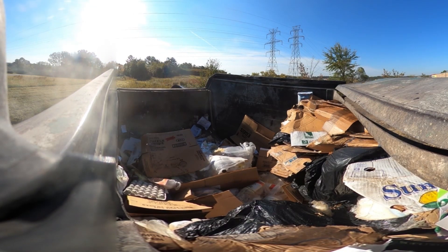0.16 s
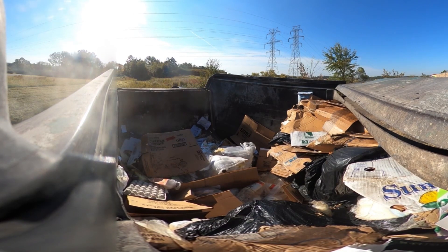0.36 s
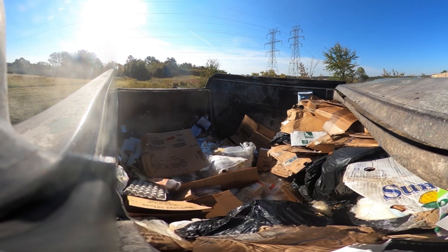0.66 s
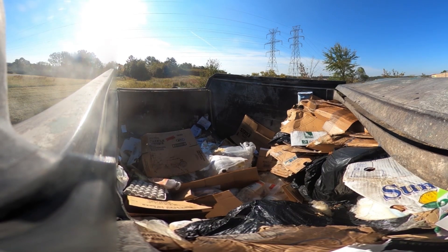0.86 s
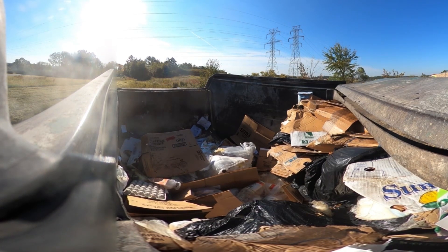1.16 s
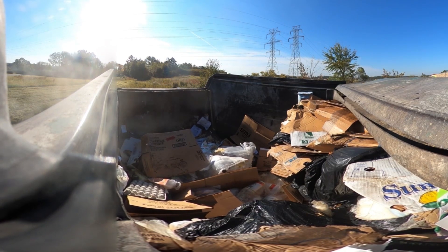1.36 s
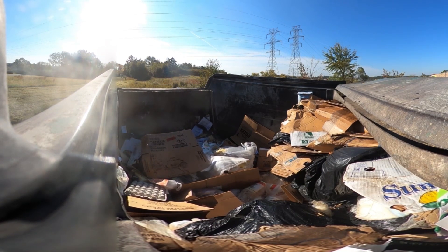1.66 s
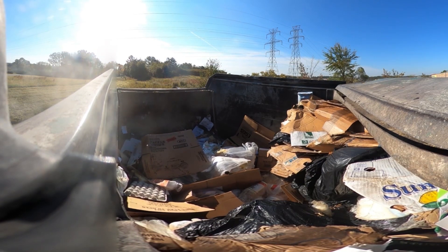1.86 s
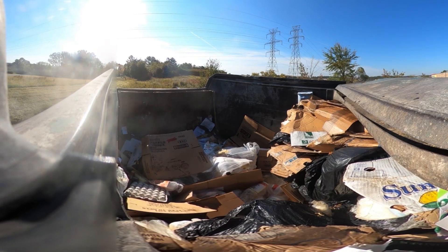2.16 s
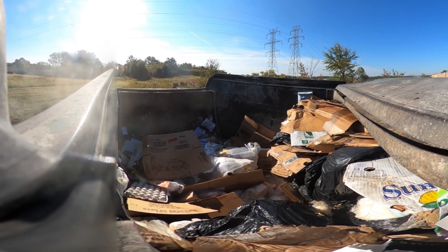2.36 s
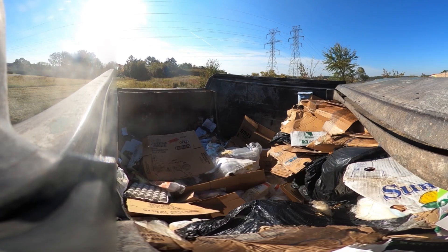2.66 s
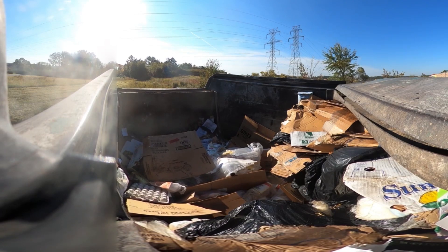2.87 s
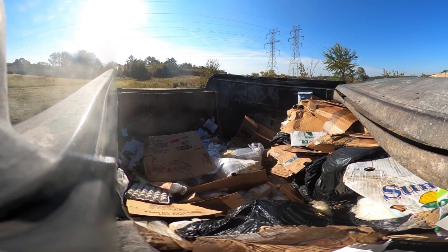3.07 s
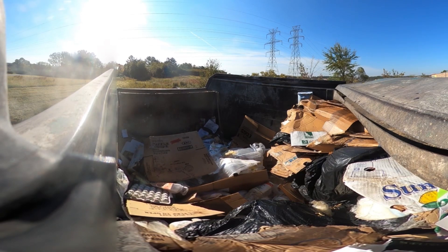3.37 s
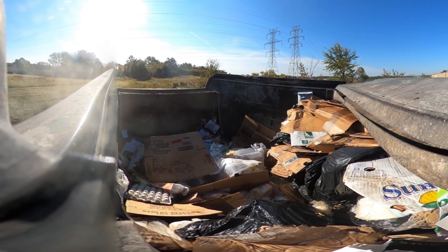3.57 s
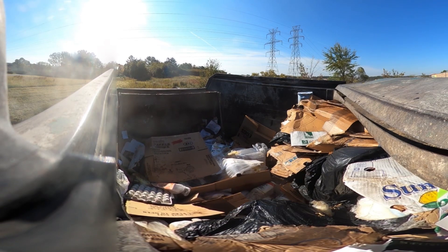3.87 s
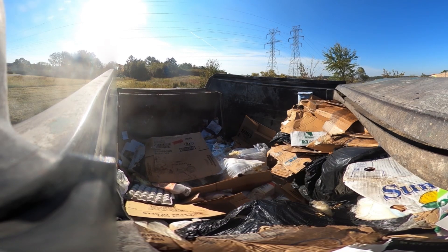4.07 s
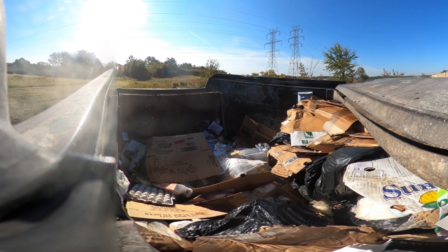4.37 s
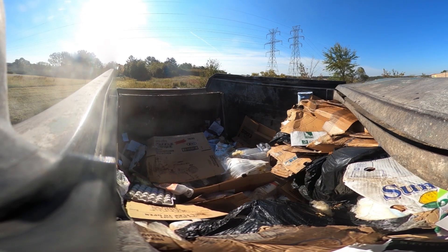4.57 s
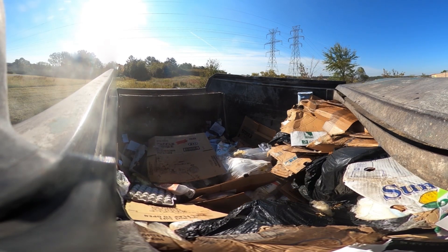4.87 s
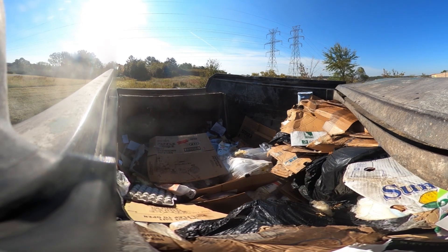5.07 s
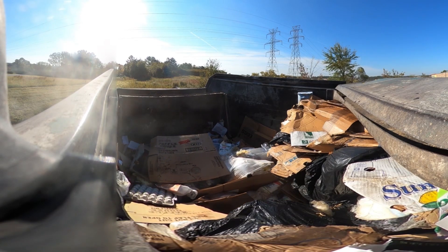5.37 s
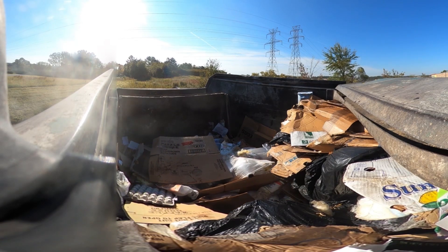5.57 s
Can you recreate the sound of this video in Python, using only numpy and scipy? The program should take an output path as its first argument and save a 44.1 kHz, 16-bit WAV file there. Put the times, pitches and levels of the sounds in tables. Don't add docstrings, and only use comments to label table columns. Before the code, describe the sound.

Outdoors, close on a steel refuse container, a truck diesel idles low beside a second, steadily knocking diesel. Almost at once the container is jolted in a dense, booming crash with rattling lids and puffs of hissing air. A final heavy blow rings the side panel, then a hydraulic pump hums and the truck engine revs up, with small ticks and a few soft thuds. The microphone rides on the container and sounds dull, with its level dipping after the crash.

```python
import sys
import numpy as np
from scipy import signal
from scipy.fft import rfft, irfft
from scipy.io import wavfile
from scipy.ndimage import uniform_filter1d

SR = 44100
rng = np.random.default_rng(int(sys.argv[2]) if len(sys.argv) > 2 else 0)


def bounce(signal):
    frames = np.transpose(np.atleast_2d(signal))
    limited = np.clip(frames, -1, 1)
    pcm = np.round(limited * 32767).astype(np.int16)
    wavfile.write(sys.argv[1], SR, pcm)


def decibels_to_gain(level_db):
    exponent = np.asarray(level_db, float) / 20
    return 10 ** exponent


N = 252693
T = np.arange(N) / SR


def curve(table):
    s, *columns = np.transpose(table)
    return [np.interp(T, s, c) for c in columns]


def unit(x):
    return x / np.sqrt(np.mean(x ** 2))


def noise():
    return rng.standard_normal(N)


def colour(x, points):
    hz, db = np.transpose(points)
    f = np.maximum(np.fft.rfftfreq(N, 1 / SR), 1)
    gain = decibels_to_gain(np.interp(np.log(f), np.log(hz), db))
    return unit(irfft(rfft(x) * gain, N))


def butter(x, order, hz, kind="low"):
    return signal.sosfilt(signal.butter(order, hz, kind, fs=SR, output="sos"), x)


def ring(x, hz, width):
    return signal.lfilter(*signal.iirpeak(hz, hz / width, SR), x)


def smooth(x, size):
    return uniform_filter1d(uniform_filter1d(x, size), size)


def walk(rate):
    k = int(SR / rate)
    held = np.repeat(rng.standard_normal(N // k + 1), k)
    return 1.42 * smooth(held, k)[:N]


def grains(rate, spread_db):
    chance = rng.random((2, N))
    size = decibels_to_gain(-spread_db * np.log(1 - chance[1]))
    return (chance[0] < rate / SR) * size * noise()


def tone(turns, db):
    return np.sqrt(2) * decibels_to_gain(db) * np.sin(2 * np.pi * turns)


def swell(s, db, rise_s, fall_db_per_s):
    t = np.arange(0, N + 64, 64) / SR - s
    gain = decibels_to_gain(db - fall_db_per_s * np.clip(t, 0, 2)) * np.clip(1 + t / rise_s, 0, 1)
    return np.interp(np.arange(N) / 64, np.arange(len(t)), gain)


def pile(table, rise_s, fall_db_per_s):
    return np.sqrt(sum(swell(s, db, rise_s, fall_db_per_s) ** 2 for s, db in table))


def strikes(table, ratios, t60_s, tail, dull=1):
    out, t = np.zeros(N + SR), np.arange(SR // 2) / SR
    for s, db, hz, *own_t60_s in table:
        fall = np.log(1000) / (own_t60_s[0] if own_t60_s else t60_s)
        body = 0
        for r in ratios:
            mode = np.sin(2 * np.pi * min(hz * r, .45 * SR) * t)
            body = body + mode * np.exp(-t * fall * r ** .5) / r ** dull
        rough = unit(ring(rng.standard_normal(len(t)), min(hz * ratios[1], .4 * SR), hz))
        hiss = tail * rough * np.exp(-t * fall)
        attack = np.minimum(t / 0.0011, 1)
        start = int(s * SR)
        out[start:start + len(t)] += .5 * decibels_to_gain(db) * (body + hiss) * attack
    return out[:N]


def behind_wall(x):
    return butter(x, 6, 8500)


# time in seconds, tooth rate in Hz, oil pressure pulse in dB.
PUMP_WORK = [(0, 110.4, -54), (1.4, 108.6, -59.5), (1.47, 109.6, -26.5), (1.8, 108.8, -21),
             (2.2, 108.4, -17), (2.65, 107.4, -17), (2.85, 109.2, -15.5), (3.1, 113.2, -14),
             (3.33, 119.7, -24), (3.53, 126.5, -17), (3.66, 132.4, -28.5), (3.94, 142, -29.5),
             (4.15, 145.6, -29), (4.4, 151.3, -31), (4.6, 153.4, -26.5), (4.85, 156.7, -26.5),
             (5.2, 157.9, -27), (5.73, 159.4, -26)]


def revs():
    return np.clip((curve(PUMP_WORK)[0] - 109) / 50, 0, 1)


# share of the rev-up (0-1), firing tone in dB,
# its second harmonic in dB, fan and oil roar in dB.
SPEED_LEVELS = [(0, -22, -22.5, -40), (.1, -18, -29.5, -40.5), (.25, -16.5, -18, -39.5),
                (.35, -20.5, -23.5, -39), (.45, -15, -27.5, -38), (.6, -13.5, -25, -37.5),
                (.78, -15, -28, -37), (.88, -13, -29, -38.5), (.96, -13.5, -30, -38), (1, -15, -23, -38)]


def by_speed(column):
    rows = np.transpose(SPEED_LEVELS)
    return np.interp(revs(), rows[0], rows[column])


def duck_db():
    return np.interp(T, (0.27, 1.58, 1.74, 2.915), (0, -4.5, -4.5, 0))


def hiss_db():
    return -51.5 + 1.3 * duck_db() + 4 * np.clip((.9 - T) / 0.36, 0, 1)


# time in seconds, strength in dB.
CONTAINER_JOLTS = [(.324, -17), (.385, -18.5), (.45, -19), (.53, -18.5), (.59, -16), (.63, -21.5),
                   (.68, -24.5), (.72, -19.5), (.79, -23.5), (.88, -24), (.97, -22.5), (1.06, -24),
                   (1.12, -22.5), (1.25, -27.5), (1.335, -21)]


def shaking():
    jolts = pile(CONTAINER_JOLTS, rise_s=0.0038, fall_db_per_s=30.5)
    settled_s = 1.406
    return smooth(jolts, 150) * decibels_to_gain(-60 * np.clip(T - settled_s, 0, 1))


# pitch in Hz, level in dB per Hz.
THIN_HISS_COLOUR = [(7000, -43), (8800, -2), (9600, -5.5), (10900, -2.5), (11400, -9.5), (13300, -8),
                    (14200, -18.5), (16000, -47)]


def thin_hiss():
    flutter_db = 1.3 * walk(12) + 1.2 * walk(60)
    return decibels_to_gain(hiss_db() - 21.0 + flutter_db) * colour(noise(), THIN_HISS_COLOUR)


# pitch in Hz, level in dB per Hz.
ROAR_SPECTRUM = [(12, -24), (20, -2.5), (43, -4), (64, -8), (128, -13), (161, -15), (230, -15.5),
                 (393, -26), (843, -30), (1300, -27), (1590, -31.5), (2720, -38.5), (4640, -51),
                 (7150, -55), (8770, -64), (11400, -92.5), (19300, -120)]


def roar():
    shaken = decibels_to_gain(-13.5 - 4 * T) * shaking()
    load_db = 10 * np.log10(decibels_to_gain(by_speed(column=3) + duck_db()) ** 2 + shaken ** 2)
    wide = colour(noise(), ROAR_SPECTRUM)
    out, treble_db = 0, hiss_db()
    for hz in 25 * 2 ** np.arange(0, 9.4, .5):
        top = np.clip(np.log2(hz / 1200) / 2, 0, 1)
        open_db = 2 * (hz > 380) * (T < .33)
        bass_part_db = (1 - top) * (load_db + 11.5 + open_db)
        top_part_db = top * (treble_db + 26)
        out = out + decibels_to_gain(0.7 * walk(9) + bass_part_db + top_part_db) * ring(wide, hz, hz / 3)
    return out


# time in seconds, pitch in Hz, level in dB.
VALVE_WHINE = [
    (0, 3200, -69.5),
    (4.8, 3260, -68.5),
    (5.1, 3250, -53),
    (5.4, 3280, -54),
    (5.73, 3370, -50),
]


def oil_valve():
    hz, db = curve(VALVE_WHINE)
    breathy = unit(smooth(noise(), 180))
    return breathy * tone(np.cumsum(hz) / SR, db)


# time in seconds, firings so far.
DIESEL_FIRINGS = [(0.0, -0.04), (0.3, 14.59), (0.6, 28.57), (0.9, 43.15), (1.5, 71.61), (1.9, 90.77),
                  (2.4, 114.9), (3.15, 151.68), (3.45, 166.19), (3.9, 188.0), (4.35, 209.99), (5.0, 241.88),
                  (5.73, 278.17)]
# time in seconds, level in dB.
DIESEL_LOAD = [
    (0, 0),
    (1.3, 0.5),
    (2.3, 1.5),
    (2.9, 0),
    (3.4, 0),
    (4.0, -2.5),
    (4.7, -1.5),
    (5.2, -2.5),
    (5.73, -2),
]
# pitch in Hz, width in Hz, level in dB.
BLOCK_MODES = [(1089, 81, 1), (1270, 325, -2), (1755, 180, -3.5), (2637, 450, -6.5), (3400, 1200, -17),
               (5080, 1100, -19.5), (6650, 1400, -26.5)]


def diesel():
    knock_db = -37.7 + duck_db() + curve(DIESEL_LOAD)[0]
    hum_db = np.maximum(-20 - 25.5 * T, -42.5) + 2.0 * walk(7.4)
    turns = curve(DIESEL_FIRINGS)[0] + 1.26
    turns = turns + .04 * np.cos(2 * np.pi * (turns - 2.2) / 3)
    count, since = turns.astype(int), turns % 1
    firings = count[-1] + 1
    size_db = 0.69 * rng.standard_normal(firings) + np.resize([.6, -.4, -1.5], firings)
    size = decibels_to_gain(size_db)[count]
    burst = size * (1 - np.exp(-since / 0.1)) * np.exp(-since / 0.31)
    burst = burst + 0.14 * np.exp(-((since - .4) / 0.035) ** 2) + 0.19
    force = burst * noise()
    block = sum(decibels_to_gain(db) * ring(ring(force, f, 1.3 * w), f, 1.3 * w) for f, w, db in BLOCK_MODES)
    rap = size * np.roll(np.diff(count, prepend=count[0]), SR // 500)
    rap = rap + .45 * np.roll(rap, int(SR * 3 / 1280))
    rap = ring(ring(ring(rap, 1290, 340), 1217, 380), 1296, 520)+ 0.13 * ring(ring(rap, 2650, 540), 2650, 540)
    knock = decibels_to_gain(knock_db) * unit(0.86 * unit(block) + 0.88 * unit(rap))
    return behind_wall(knock + tone(2 * turns, hum_db) + tone(turns, -45))


# multiple of the
# tooth rate, dB at idle, dB while revving up, dB revved.
FAINT_TONES = [(0.451, -36, -40.5, -62.5), (.9, -36, -36.5, -51.5), (1.2, -51, -32.5, -41.5),
               (1.4, -46, -35.5, -46.5), (1.5, -38.5, -47, -42.5), (3.96, -59, -49.5, -51.5)]
# time in seconds, level in dB.
PUMP_SECOND = [(1.4, -38.5), (2.0, -38), (2.3, -33), (3.0, -35), (3.25, -41.5), (3.65, -33.5),
               (3.95, -42.5), (4.15, -41), (4.3, -33.5), (4.48, -34.5), (4.6, -43), (4.75, -44), (5.1, -38),
               (5.73, -38.5)]
# time in seconds, pitch in Hz, level in dB.
FAN_TONE = [
    (3.2, 345, -47),
    (3.55, 385, -45.5),
    (3.7, 399, -45),
    (4.0, 408, -41),
    (4.3, 428, -48),
    (4.8, 438, -49),
    (5.2, 446, -42),
    (5.73, 455, -43.5),
]


def engine():
    hz, pump_db = curve(PUMP_WORK)
    turns = np.cumsum(hz) / SR
    firings = turns * 3 / 10
    exhaust = tone(firings, by_speed(column=1) + 2.1 * duck_db() + 0.54 * walk(19))
    exhaust = exhaust + tone(2 * firings + 0.17, by_speed(column=2) + 0.81 * duck_db() + 0.7 * walk(6.6))
    revved = revs()
    faint = 0
    for k, *dbs in FAINT_TONES:
        faint = faint + tone(k * turns, np.interp(revved, (0, .7, 1), dbs) + 0.78 * walk(8.4))
    fan_hz, fan_db = curve([(3.0, FAN_TONE[0][1], -70), *FAN_TONE])
    fan_turns = np.cumsum(fan_hz * (1 + .006 * walk(12))) / SR
    fan = tone(fan_turns, fan_db - 2.0 + 3.5 * walk(15))
    engaged = np.clip((pump_db + 72.5) / 35, 0, 1)
    pump = tone(turns, pump_db + 0.5 * walk(11))
    second = engaged * tone(2 * turns, curve(PUMP_SECOND)[0] + 1.2 * walk(8.3))
    third = tone(3 * turns, pump_db - 27.5 - 9 * np.clip(5 * revved, 0, 1) + 0.74 * walk(3.8))
    return exhaust + pump + second + third + faint + fan


# time in seconds, peak in dB, pitch in Hz.
LOOSE_TICKS = [(.612, -24, 3620), (1.398, -38, 5000), (1.418, -39, 6100), (1.44, -38, 6100),
               (1.462, -40, 5470), (1.5102, -38, 4740), (1.5515, -45, 5200), (1.862, -41, 5470),
               (2.087, -39.5, 5550), (2.237, -38.5, 4300), (2.5332, -37, 4860), (2.753, -40, 5710),
               (2.917, -39, 5200), (2.985, -35, 6564), (2.85, -39, 6500), (3.015, -39, 7000),
               (3.0568, -37, 5190), (3.08, -38, 7000), (3.11, -39, 6740), (3.155, -38, 7000),
               (3.19, -38, 5486), (3.26, -41, 7000), (3.59, -42, 7597), (3.76, -36, 6002),
               (4.0993, -38, 4560), (4.14, -37, 5997), (4.245, -32, 4300), (4.33, -40, 6600),
               (4.494, -42, 5180), (4.8022, -37, 5224), (4.939, -37, 5355), (5.487, -36, 6200),
               (5.5535, -37, 6523), (5.6293, -45, 5160)]


def loose_parts():
    ticks = strikes(LOOSE_TICKS, (1, 1.3, 1.9), t60_s=0.07, tail=1.7)
    return behind_wall(0.32 * ticks) + 0.03 * butter(ticks, 2, (9500, 15000), "band")


# peak time in seconds, boom in dB, pitch in Hz.
PANEL_SHAKES = [(.24, -18.5, 55.7), (0.389, -11.5, 38.2), (.53, -14.5, 36), (.66, -21, 60.15),
                (.77, -18, 38.2), (.86, -23.5, 38), (.87, -16.5, 55), (.94, -19, 56), (1.12, -22, 40),
                (1.2, -19, 40), (1.36, -19, 40), (1.07, -22, 56), (1.21, -21, 56), (1.32, -20, 56),
                (1.42, -12, 54.7), (1.49, -17.5, 54.7), (1.63, -16.5, 54.3), (1.715, -16.5, 54.4),
                (1.77, -26, 54), (2.14, -20, 53.8), (2.43, -18.5, 54.3), (3.1, -32, 55), (3.37, -22.5, 55),
                (3.58, -21.5, 56), (3.72, -26.5, 56), (4.29, -14, 55.32), (4.5, -17, 55.7)]


def panel():
    turns = np.cumsum(1 + 0.012 * walk(5.47)) / SR
    booms = 0
    for s, db, hz in PANEL_SHAKES:
        booms = booms + swell(s, db, rise_s=0.062, fall_db_per_s=105) * tone(hz * turns, 0)
    return booms + tone(54.7 * turns, -37.5 + 4 * walk(4.3))


# time in seconds, level in dB.
AIR_PUFFS = [(.35, -40.5), (.395, -36), (.495, -35), (.58, -36), (.66, -44), (.725, -41), (.805, -42),
             (.87, -43), (.92, -46), (.99, -50.5), (1.05, -49), (1.12, -50.5), (1.2, -51.5), (1.36, -58),
             (1.43, -58), (3.1, -57.5)]
# time in seconds, level in dB.
AIR_LEAK = [
    (.31, -74),
    (.36, -40.5),
    (.64, -42),
    (.7, -46),
    (.92, -49),
    (1.0, -59),
    (1.22, -60),
    (1.28, -66.5),
    (1.6, -80),
]
# pitch in Hz, level in dB per Hz.
AIR_COLOUR = [(3000, -22), (4200, -0.5), (4680, -13.5), (5180, 2), (7340, 2.5), (8140, -4), (8770, -10.5),
              (10000, -23), (11000, -23), (11800, -33), (14000, -42.5), (15200, -48), (19000, -100)]
# pitch in Hz, level in dB.
VALVE_WHISTLES = [(5373, -9), (5911, -8), (6364, -7), (6805, -9), (7078, -3), (7355, -11), (7612, -7),
                  (7853, -2)]


def air():
    puffs = 1.15 * pile(AIR_PUFFS, rise_s=0.035, fall_db_per_s=97)
    flow = np.hypot(puffs, decibels_to_gain(curve(AIR_LEAK)[0]))
    jet = noise()
    whistle = unit(sum(decibels_to_gain(db) * ring(jet, hz, 14) for hz, db in VALVE_WHISTLES))
    return flow * decibels_to_gain(0.6 * walk(39.2)) * (colour(jet, AIR_COLOUR) + .2 * whistle)


# time in seconds, peak in dB, main mode in Hz.
LID_CLANKS = [(0.325, -30, 651), (0.336, -19, 990), (0.368, -15.5, 719), (0.397, -17.5, 870),
              (0.418, -17, 1220), (0.436, -16, 1360), (0.448, -18, 1030), (0.487, -17, 1310),
              (0.509, -19, 821), (0.527, -22, 805), (0.553, -17, 697), (0.585, -13, 1100),
              (0.604, -15, 1120), (0.628, -14, 853), (0.648, -16, 830), (0.672, -17, 980),
              (0.694, -18, 708), (0.706, -17, 1090), (0.72, -19, 1180), (0.754, -18, 770),
              (0.793, -21, 650), (0.815, -21, 690), (0.841, -23, 1020), (0.872, -22, 1300),
              (0.915, -22, 975), (0.954, -18, 1040), (0.976, -25, 1290), (1.001, -26, 880),
              (1.012, -22, 1120)]


def clanks():
    return butter(strikes(LID_CLANKS, (1, 1.37, 1.9), t60_s=0.042, tail=0.69), 2, 3000)


# time in seconds, peak in dB, main mode in Hz, time to fall 60 dB in seconds.
STEEL_BLOWS = [(0.326, -9, 165, 0.076), (0.415, -10, 243, .12), (0.591, -3, 252.6, 0.2),
               (0.618, -5, 181, 0.1), (.7, -15, 204, .15), (.937, -7, 242, 0.17), (1.073, -19, 200, 0.11),
               (1.138, -11, 145, .12), (.64, -11, 105, .3), (.7, -10, 100, .25), (1.3, -12, 103.7, .4),
               (1.355, -5, 222.6, 0.3), (1.4, -14, 215, 0.2), (1.43, -16, 159.9, 1.6),
               (1.48, -18, 208, .12), (3.57, -20.5, 188, .4), (3.645, -18, 259, 0.27),
               (3.76, -15, 290.1, 0.17), (4.2, -27, 285, 0.22), (5.62, -13, 227, 0.26)]


def blows():
    return butter(strikes(STEEL_BLOWS, (1, 1.52, 2.3, 3.7, 5.6), t60_s=.2, tail=0.3, dull=1.83), 3, 2500)


# pitch in Hz, level in dB per Hz.
SHEET_COLOUR = [(18, -31.5), (30, -0.5), (52, -13), (86, -10), (190, -4), (250, -2), (400, -5.5), (488, -7),
                (539, -5.5), (900, -28), (1170, -46), (1980, -120)]
# pitch in Hz, level in dB per Hz.
RATTLE_COLOUR = [(350, -19), (600, 2), (1040, 0.5), (1250, -10), (1360, -1.5), (2170, -35.5), (2370, -16.5),
                 (2760, -24), (3150, -13), (4460, -22.5), (5000, -19), (6500, -45), (11000, -120)]


def crash():
    knocks = unit(grains(4000, spread_db=1.2))
    spacing = (np.arange(48) + 0.72 * rng.random(48)) / 48
    modes = 0
    for k, hz in enumerate(70 * 14 ** spacing):
        modes = modes + unit(ring(knocks, hz, hz / 8)) / hz ** .5 * (-1) ** k
    direct = colour(knocks, [(70, -3.5), (1000, -13.5)])
    sheet = colour(unit(modes) + 0.34 * direct, SHEET_COLOUR)
    rattle = colour(grains(9000, spread_db=0.5), RATTLE_COLOUR)
    rattle_db = -11 - 14 * np.clip(T - .62, 0, 1)
    return shaking() * (sheet + decibels_to_gain(rattle_db) * rattle)


def scene():
    background = thin_hiss() + roar() + oil_valve() + diesel() + engine()
    container = loose_parts() + panel() + air() + 0.59 * clanks() + .5 * blows() + crash()
    return (background + container)[None]


def band_limit(x):
    return signal.sosfilt(signal.butter(12, 15250, fs=SR, output="sos"), x)


def record(dry):
    faded_in = dry * np.clip(np.arange(N) / 200, 0, 1)
    light = butter(faded_in, 3, 29, "high")
    rounded = np.tanh(1.131 * light) / 1.117
    dull = butter(rounded, 2, 10500)
    return band_limit(dull)


dry = scene()
out = record(dry)
bounce(out)
```